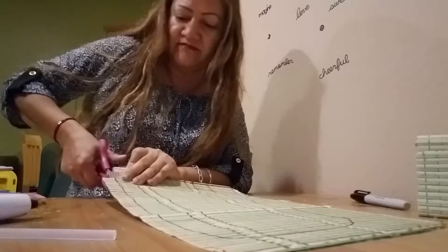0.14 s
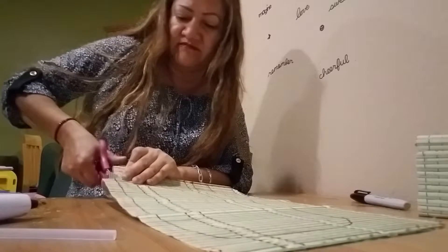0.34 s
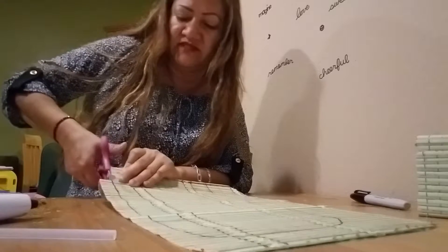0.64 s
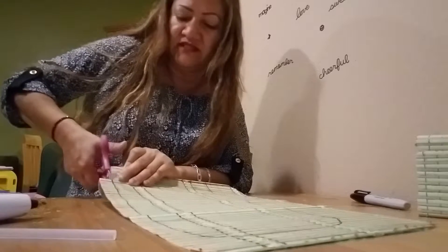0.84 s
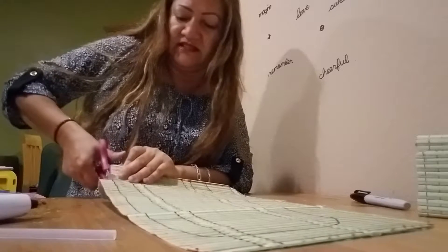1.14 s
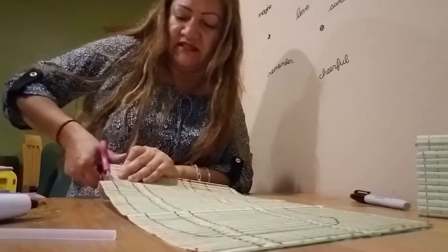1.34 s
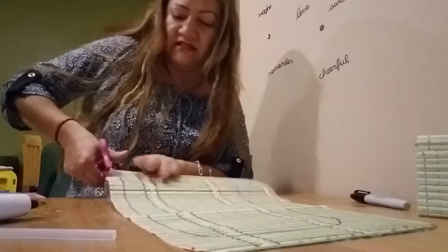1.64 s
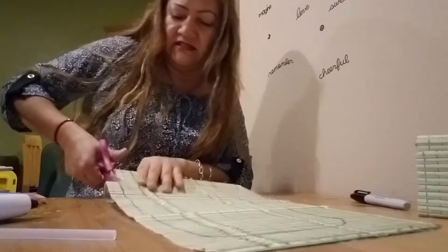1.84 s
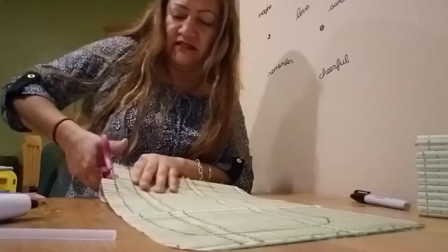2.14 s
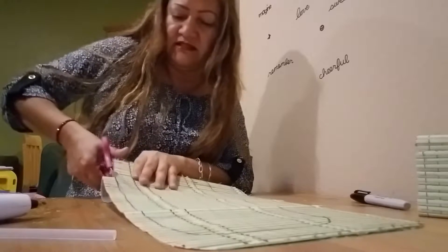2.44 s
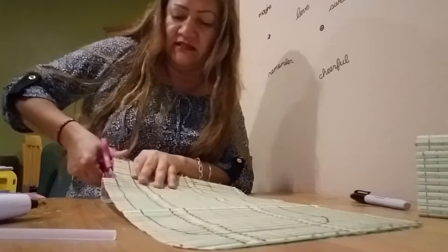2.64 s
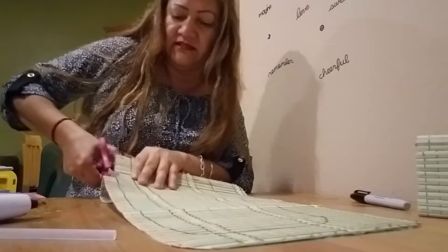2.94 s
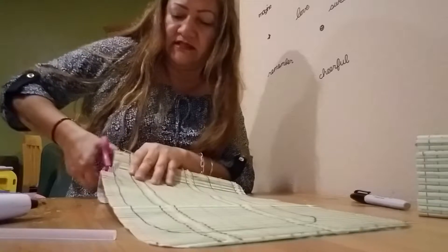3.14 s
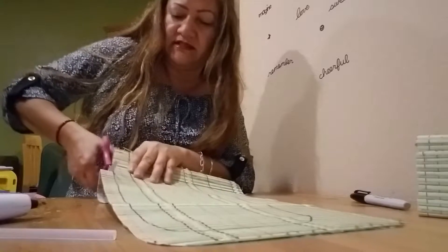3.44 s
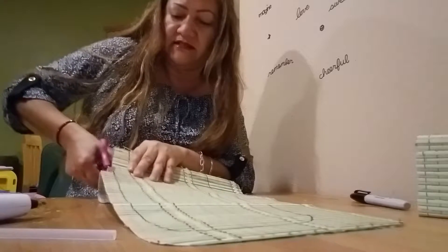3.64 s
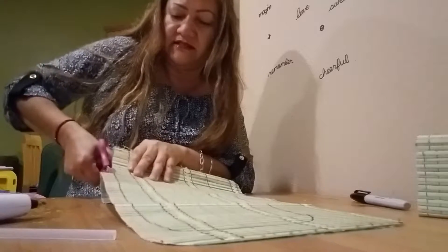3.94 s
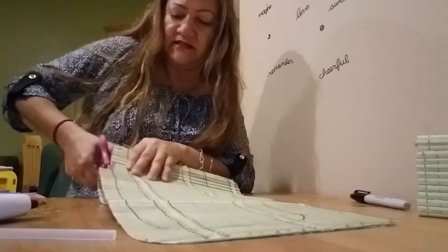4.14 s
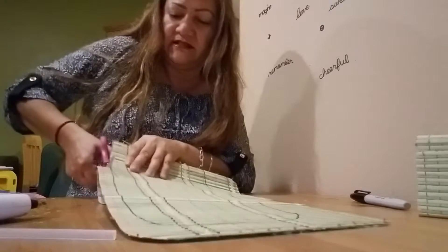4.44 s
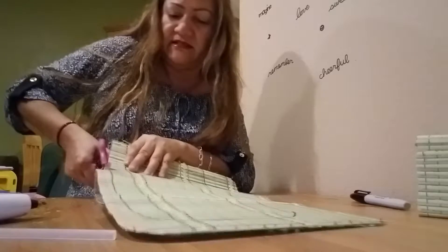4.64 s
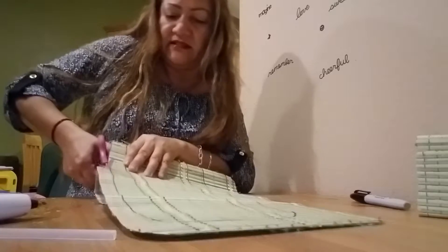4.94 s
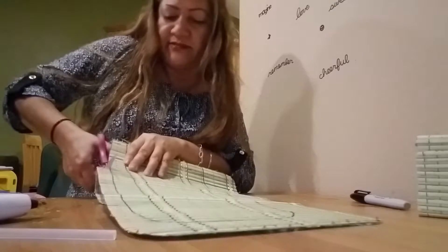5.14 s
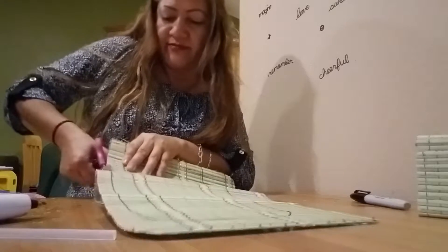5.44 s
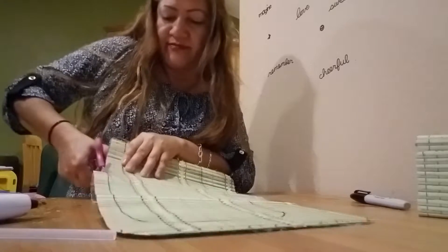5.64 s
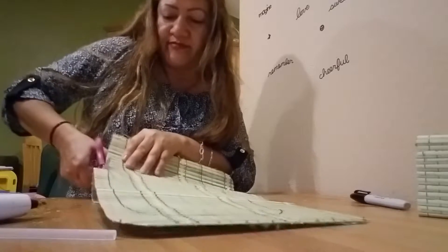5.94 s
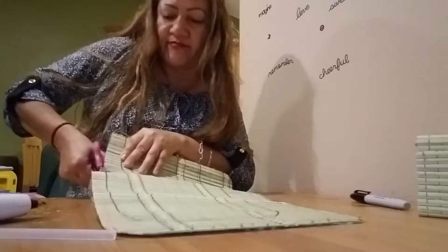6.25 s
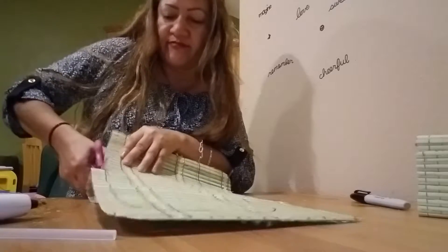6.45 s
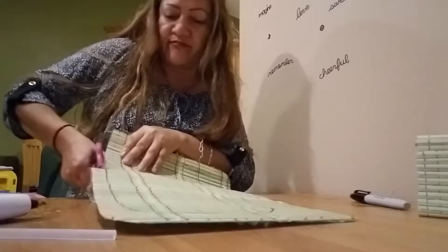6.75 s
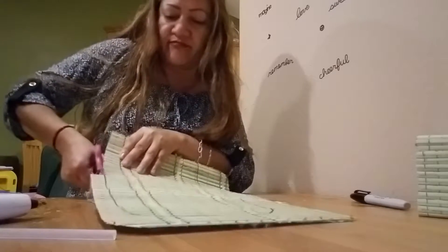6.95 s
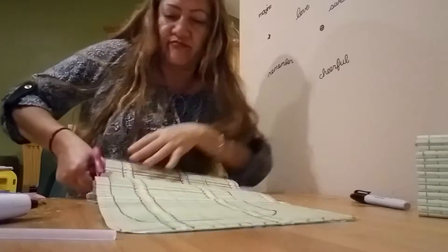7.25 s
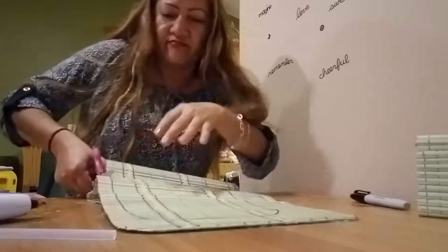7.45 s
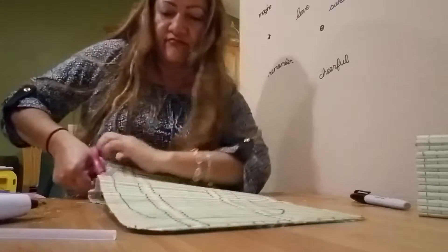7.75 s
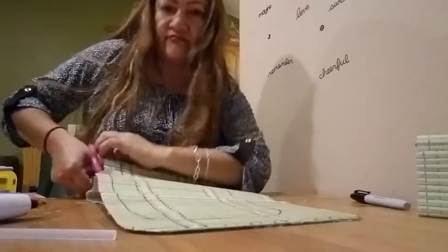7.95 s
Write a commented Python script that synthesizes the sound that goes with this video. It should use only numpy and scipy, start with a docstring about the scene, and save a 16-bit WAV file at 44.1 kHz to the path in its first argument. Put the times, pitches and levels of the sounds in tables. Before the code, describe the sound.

Scissors work through a tough slatted mat on a table, making eight cuts at about one a second. Each squeeze brings a gritty crunch and sharp snaps, often in close pairs, with a soft low thud from the table top. Between cuts the blades tick and scrape open, loose slats click and the mat slides faintly. The sound is close, in a small, hard-walled room with a faint hum.

```python
"""A light wooden knock, a gritty squeeze, a sharp snap: scissors work through a slatted mat on a table.
Each squeeze grinds the blades into the slats, which give way, often two close together,
and set the table top booming. The steel ticks and loose slats knock; between cuts the blades
scrape open and a hand slides the mat along. The small, hard-walled room hums faintly."""
import sys
import numpy as np
from scipy import signal
from scipy.fft import rfft, irfft
from scipy.io import wavfile
from scipy.ndimage import uniform_filter1d

SR = 44100
rng = np.random.default_rng(int(sys.argv[2]) if len(sys.argv) > 2 else 0)


def wav_out(sig):
    """Save sig, one row per channel (or a flat mono array), as 16-bit PCM at SR to the path in sys.argv[1]."""
    wavfile.write(sys.argv[1], SR, np.round(np.clip(np.atleast_2d(sig).T, -1, 1) * 32767).astype(np.int16))


N = 356416
KERNEL_HZ = np.fft.rfftfreq(2048, 1 / SR)  # frequency grid of the EQ curves
STRAIN_LEAD_S = .007  # fibres strain this long before a snap

# Levels are relative within each table; each layer sets its own gain.
# room tone spectrum: frequency_hz, level_db
ROOM_TONE_EQ = [(25, -37.5), (33, -12), (48, -5.5), (72, -1.5), (98, -12), (160, 0.5), (280, -6), (420, -4),
                (560, -11.5), (800, -12), (1600, -19), (4000, -27.5), (8000, -32), (10000, -37.5),
                (14000, -28)]
# hum peaks in the room tone: pitch_hz, width_hz, boost_db
HUM_PEAKS = [(175, 9, 9), (261, 7, 7), (338, 10, 3), (412, 9, 8)]
# likeness of diffuse sound at the two microphones: frequency_hz, correlation
STEREO_LIKENESS = [(60, 0.9), (400, 0.86), (700, 0.27), (1900, 0.019), (3300, 0.12), (7000, -0.035),
                   (16000, 0.22)]
# reverb bands: centre_hz, level_db, t60_s
REVERB_BANDS = [(145, -1.5, 0.82), (421, 0.5, 0.35), (1130, -7, 0.31), (3240, -3.5, 0.36), (7000, -2, 0.33),
                (14800, -0.5, 0.26)]
# colour difference between the microphones: frequency_hz, left_minus_right_db
MIC_EQ = [(100, 3), (700, 1.5), (1400, 0), (2500, 2.5), (3700, 0), (6000, 1), (8000, -3), (9500, 2.5),
          (15000, -0.5)]
# a hand pushes the mat along: start_s, length_s, level_db
MAT_SLIDES = [(0.6, 0.15, -60), (1.496, 0.21, -58), (1.699, 0.074, -55), (1.787, 0.44, -63),
              (4.755, 0.27, -68), (6.3, 0.16, -59), (6.475, 0.23, -64.5), (7.072, 0.093, -58.5)]
# colour of the sliding mat: frequency_hz, gain_db
SLIDE_EQ = [(150, -4), (450, -3.5), (800, 0), (1100, -6), (1400, -1), (1700, -3), (2180, -1.5),
            (2400, -9.5), (4000, -17.5), (8000, -33.5), (16000, -26)]
# resonances of the steel blades: pitch_hz, width_hz, boost_db
STEEL_MODES = [(1343, 100, 1), (2610, 270, 1.5), (6300, 550, 1.5), (7600, 350, 2), (8140, 430, 1.5)]
# colour of steel rubbing on steel and fibre: frequency_hz, gain_db
GRIND_EQ = [(100, -20), (600, 0.5), (1400, 3.5), (2500, -1.5), (4000, -3), (6000, -4), (8000, -8),
            (9400, -13), (14000, -7.5), (16000, -3.5)]
# the blades scrape open: start_s, length_s, level_db, treble_db
BLADE_OPENINGS = [(0.585, 0.084, -56.5, 3.5), (1.881, 0.11, -62.5, 1.5), (2.956, 0.16, -56.5, -6),
                  (4.023, 0.1, -55.5, -1), (4.887, 0.13, -65.5, 7.5), (5.592, 0.072, -54.5, -5),
                  (6.311, 0.15, -55.5, 0), (7.013, 0.23, -61, -4.5), (7.701, 0.2, -60, -4.5)]
# squeezes of the scissors: bite_s, shut_s, grind_db, crunch_length_s, table_jolt_db
SQUEEZES = [(0.17, 0.25, -65, 0, -55), (0.96, 1.2, -66.5, 0.052, -52), (2.325, 2.645, -58, 0.11, -49.5),
            (3.384, 3.666, -67, 0.012, -47), (4.383, 4.59, -59.5, 0.005, -46.5),
            (5.194, 5.375, -60, 0.014, -47.5), (5.95, 6.15, -59, 0.049, -46),
            (6.64, 6.87, -65.5, 0.089, -46)]
# modes of the table top: pitch_hz, level_db, t60_s
TABLE_MODES = [(120.2, 5.5, 0.22), (58.3, -6, 0.24), (86, -8, 0.12), (174, -12, 0.38), (348, -2, 0.22)]
# loose slats hit the blades and each other: start_s, level_db, hollow_db, crisp_db, pitch_hz
SLAT_KNOCKS = [(0.0742, -44.5, -32, -5.5, 3330), (0.7473, -57, 19.5, -16, 1250),
               (1.2998, -47.5, -11, -1, 2340), (2.0638, -59.5, 7, -19, 1980), (2.36, -47, -18, 4, 1920),
               (2.5982, -41, -13, -6.5, 1480), (2.9559, -52.5, 6.5, -10, 1400), (3.4292, -53.5, 2, 1, 2060),
               (3.595, -58, -2, -2, 1420), (5.65, -57.5, 12, -9, 1870), (5.9827, -47, 5, -8, 1590),
               (6.639, -54, -4, -8, 1720), (7.705, -49.5, -3, -4, 4300), (7.7484, -50, 5, -12, 3320),
               (7.787, -60, 7, -15, 3300)]
# the steel edges catch on each other: start_s, level_db, brightness_db
STEEL_TICKS = [(0.19, -60.5, 7), (0.406, -52, 5), (0.5831, -58, 1), (0.9574, -64, 10), (1.063, -50.5, 2.5),
               (2.4017, -39, 3), (2.828, -62, 6), (3.3812, -51.5, 2.5), (3.447, -48, 1), (4.399, -48, -1.5),
               (4.442, -48.5, 0), (4.466, -49.5, -2), (4.4922, -50.5, 5), (5.1237, -58.5, 11),
               (5.1995, -40, -1.5), (5.266, -42, 2.5), (6.122, -55, -3), (6.373, -51.5, -5),
               (6.7072, -50.5, 9), (7.435, -63.5, 5), (7.987, -64, -2)]
# colour of a crack: frequency_hz, gain_db
CRACK_EQ = [(40, -28), (130, -17), (280, -14), (500, -10), (750, -6), (1300, -6.5), (2100, -5),
            (2600, -9.5), (3400, -9), (5500, -9), (8000, -6.5), (9300, -19), (11500, -16), (14500, -9),
            (16000, -22.5)]
# slats break: start_s, level_db, hollow_db, woody_db, crisp_db, pitch_hz, decay_s
SLAT_BREAKS = [(0.255, -33, 0.5, 3, 3, 1350, 0.0075), (0.2592, -36.5, 1, 6, 2.5, 1420, 0.0034),
               (1.0932, -37, 0, 1, 4, 1290, 0.0074), (1.1263, -39, 4, 5, 1.5, 1260, 0.0029),
               (1.3534, -28, 0.5, 1.5, 0.5, 1260, 0.0035), (2.442, -35.5, 5, 3.5, 4.5, 1290, 0.0035),
               (2.478, -48, 3, 13.5, -1, 1300, 0.0018), (2.5098, -42.5, 10, 5.5, -5, 1320, 0.002),
               (2.6495, -34, 6.5, 6.5, 3.5, 1290, 0.002), (3.4612, -39, 8.5, 3, -2.5, 1260, 0.011),
               (3.6433, -27.5, 3, 0.5, -1.5, 1550, 0.0053), (3.833, -27, 1, -5, 2, 1210, 0.0025),
               (4.564, -38.5, 3, -2.5, 1.5, 1190, 0.0076), (4.5903, -28, 1, 0.5, 1, 1230, 0.0053),
               (5.312, -33.5, 1.5, 6.5, 1, 800, 0.0034), (5.355, -32.5, 0.5, 0.5, 4, 914, 0.0061),
               (6.0232, -33.5, 4, 3, 0.5, 810, 0.007), (6.1465, -25.5, -0.5, -0.5, 1, 2660, 0.0032),
               (6.728, -35, 4, 0.5, 0.5, 1480, 0.007), (6.747, -38, 2.5, 0, 3, 980, 0.0068),
               (6.8056, -30.5, -0.5, -2.5, 0, 965, 0.0039), (6.8654, -33.5, -1.5, 5.5, -0.5, 2600, 0.0018)]


def from_db(db):
    """Decibels to gain."""
    return 10 ** (np.asarray(db) / 20)


def unit_rms(x):
    """Scale to unit rms."""
    return x / np.sqrt(np.mean(x ** 2) + 1e-20)


def unit_energy(x):
    """Scale each channel to unit energy."""
    return x / np.sqrt(np.sum(x ** 2, axis=-1, keepdims=True) + 1e-20)


def at_hz(points, hz):
    """Read a breakpoint curve along log frequency."""
    points = np.array(points)
    return np.interp(np.log(np.maximum(hz, 1)), np.log(points[:, 0]), points[:, 1])


def bell(hz, centre_hz, width_hz):
    """Shape of a resonance, 1 on top."""
    return 1 / (1 + (2 * (hz - centre_hz) / width_hz) ** 2)


def eq(x, curve_db):
    """Minimum-phase EQ with the given curve on KERNEL_HZ."""
    cepstrum = irfft(np.log(from_db(curve_db)))
    half = len(cepstrum) // 2
    cepstrum[1:half] *= 2
    cepstrum[half + 1:] = 0
    return signal.fftconvolve(x, irfft(np.exp(rfft(cepstrum))))[:len(x)]


def through(x, response):
    """Play a mono sound through a stereo response."""
    return signal.fftconvolve(x[None], response, axes=1)[:, :N]


def add(track, start_s, sound):
    """Mix a sound in at its cue."""
    start = max(round(start_s * SR), 0)
    track[..., start:start + sound.shape[-1]] += sound[..., :N - start]


def grains(size, per_s, spread_db):
    """Fibres catch or break at random moments, with uneven strengths."""
    born = rng.random(size) < per_s / SR
    return born * rng.choice([-1, 1], size) * from_db(spread_db * np.clip(rng.standard_normal(size), -2, 2))


def diffuse_noise(size):
    """White stereo noise, centred in the bass and wide in the treble."""
    alike = np.clip(at_hz(STEREO_LIKENESS, np.fft.rfftfreq(size, 1 / SR)), -1, 1)
    mid, side = rfft(rng.standard_normal((2, size)))
    return irfft((np.sqrt(1 + alike) * mid + np.sqrt(1 - alike) * side * [[1], [-1]]) / np.sqrt(2), size)


def room_tone(level_db=-57.5):
    """A steady bed of noise whose narrow peaks make a wavering hum."""
    hz = np.fft.rfftfreq(N, 1 / SR)
    hum_db = sum(db * bell(hz, pitch_hz, width_hz) for pitch_hz, width_hz, db in HUM_PEAKS)
    spectrum = rfft(diffuse_noise(N)) * from_db(at_hz(ROOM_TONE_EQ, hz) + hum_db)
    return from_db(level_db) * unit_rms(irfft(spectrum, N))


def room_response(mic_lag_s=.0001, scatter_s=.0028, wall_s=.0113, smear_s=.0018, swell_s=.019, size=18000):
    """The room from one spot on the mat: early sound (direct, table scatter, near wall) and tail."""
    t, hz = np.arange(size) / SR, np.fft.rfftfreq(size, 1 / SR)
    noise = diffuse_noise(size)
    direct = np.sinc((t - np.array([[2], [1]]) * mic_lag_s) * SR)  # reaches the right side first
    scatter = from_db(-.5) * unit_energy(noise * (t > 3 * mic_lag_s) * np.exp(-t / scatter_s))
    slap = from_db(-4.5) * unit_energy(noise * (t > wall_s) * np.exp(-np.abs(t - wall_s) / smear_s))
    # the tail swells as reflections pile up, and each band dies at its own pace
    late, tail = rfft(diffuse_noise(size)), 0
    swell = 1 - np.exp(-(t / swell_s) ** 4)
    centres = np.log([row[0] for row in REVERB_BANDS])
    for share, (_, db, t60_s) in zip(np.eye(len(REVERB_BANDS)), REVERB_BANDS):
        band = irfft(late * np.interp(np.log(hz + 1), centres, share), size)
        tail = tail + from_db(db) * band * unit_energy(swell * np.exp(-np.log(1000) * t / t60_s))
    return direct + scatter + slap, tail


def press(start_s, end_s, fade_s):
    """Pressure of a hand: it rises, holds and lets go."""
    t = np.arange(N) / SR
    return np.clip(np.minimum(t - start_s, end_s - t) / fade_s, 0, 1)


def mat_slides(gain_db=-.5, stick_db=3, slips_per_s=45):
    """Skin and slats rub over the table: dense, dull friction that sticks and slips."""
    t = np.arange(N) / SR
    push = sum(from_db(db) * press(s, s + length_s, fade_s=.032) for s, length_s, db in MAT_SLIDES)
    grip = rng.standard_normal(int(t[-1] * slips_per_s) + 2)
    slip = from_db(stick_db * np.interp(t * slips_per_s, np.arange(len(grip)), grip))
    rub = eq(grains(N, per_s=4000, spread_db=4.5), at_hz(SLIDE_EQ, KERNEL_HZ))
    return from_db(gain_db) * push * slip * unit_rms(rub)


def steel_ring_db():
    """The blades' resonances colour everything they touch."""
    return sum(db * bell(KERNEL_HZ, hz, width_hz) for hz, width_hz, db in STEEL_MODES)


def first_break_s(bite_s):
    """When the first slat gives way after the blades bite."""
    return min(row[0] for row in SLAT_BREAKS if row[0] > bite_s)


def blade_strokes(grind_treble_db=5, crunch_treble_db=3.5, crunch_lead_s=.019, typical_crunch_s=.073):
    """Cues for opening, grinding and crushing a first slat: start_s, end_s, level_db, treble_db."""
    strokes = [(s, s + length_s, db, treble_db) for s, length_s, db, treble_db in BLADE_OPENINGS]
    for bite_s, shut_s, grind_db, crunch_s, _ in SQUEEZES:
        strokes.append((bite_s, shut_s, grind_db, grind_treble_db))
        if crunch_s > 0:
            start_s = first_break_s(bite_s) - crunch_lead_s
            # every crunch crushes the same fibres, so a slow one is softer
            crunch_db = -46 - 10 * np.log10(crunch_s / typical_crunch_s)
            strokes.append((start_s, start_s + crunch_s, crunch_db, crunch_treble_db))
    return strokes


def blade_grind(gain_db=-2, shelf_hz=6000, sing_hz=7300, sing_db=.5):
    """The edges rub past each other and through the fibres: a gritty, faintly singing hiss."""
    out = np.zeros(N)
    catches = grains(N, per_s=2600, spread_db=6.5)
    sing = sing_db * bell(KERNEL_HZ, sing_hz, width_hz=1100)
    grit = unit_rms(eq(catches, at_hz(GRIND_EQ, KERNEL_HZ) + steel_ring_db() + sing))
    treble = signal.sosfilt(signal.butter(1, shelf_hz, "high", fs=SR, output="sos"), grit)
    for start_s, end_s, db, treble_db in blade_strokes():
        shelved = grit + (from_db(treble_db) - 1) * treble
        out += from_db(db + gain_db) * press(start_s, end_s, fade_s=.025) * shelved
    return out


def table_thuds(gain_db=6, attack_s=.033, typical_snap_db=-32.5, follow=.58, fade_db_per_s=20):
    """Each break sets the table top booming: more for a hard snap, less as the squeeze goes on."""
    out, t = np.zeros(N), np.arange(22000) / SR
    for start_s, snap_db, *_ in SLAT_BREAKS:
        bite_s, *_, squeeze_db = max(row for row in SQUEEZES if row[0] < start_s)
        fade_db = fade_db_per_s * (start_s - first_break_s(bite_s))
        jolt_db = squeeze_db + follow * (snap_db - typical_snap_db) - fade_db
        boom = sum(from_db(db - 60 * t / t60_s) * np.sin(2 * np.pi * (hz * t + rng.random()))
                   for hz, db, t60_s in TABLE_MODES)
        add(out, start_s, from_db(jolt_db + gain_db) * boom * (1 - np.exp(-t / attack_s)))
    return out


def ripple_db(x):
    """Broad humps and dips in the spectrum of a short stereo sound, on KERNEL_HZ."""
    power = np.mean(np.abs(rfft(x, 2 * (len(KERNEL_HZ) - 1))) ** 2, axis=0)
    power = uniform_filter1d(power, size=27)
    return 10 * np.log10(power / power.mean() + 1e-9)


def fracture(decay_s, lightness, attack_s=.00018, strain_db=-11, break_delay_s=.0016, size=2048):
    """Fibres strain, then fail in one hard break amid an avalanche of small ones."""
    t = np.arange(size) / SR - STRAIN_LEAD_S
    after = np.maximum(t, 0)
    strain = from_db(strain_db) * np.exp(-np.abs(t) / (.39 * decay_s))
    avalanche = (1 - np.exp(-(after / attack_s) ** 2)) * np.exp(-after / decay_s)
    splinters = unit_energy((strain + avalanche) * grains(size, per_s=11000, spread_db=7.5))
    main_break = .6 * signal.unit_impulse(size, round(STRAIN_LEAD_S * SR) + round(break_delay_s * SR))
    return unit_energy(splinters + (1 + 1.85 * lightness) * main_break)  # light hits click more cleanly


def crack(db, hollow_db, woody_db, crisp_db, pitch_hz, decay_s, gain_db=37.5, ring_db=8.5, ring_q=6.7):
    """The voice of knocks, ticks and snaps: a sharp burst rings slat and steel into the room."""
    lightness = np.clip((-32 - db) / 15, 0, 1)  # 0 for a hard snap, 1 for a faint tick
    burst = fracture(decay_s, lightness)
    shade = [(700, hollow_db), (1300, woody_db), (2300, woody_db),
             (3600, -crisp_db / 4), (8000, crisp_db / 2), (10500, crisp_db)]
    slat_ring_db = ring_db * bell(KERNEL_HZ, pitch_hz, pitch_hz / ring_q)
    tone_db = at_hz(CRACK_EQ, KERNEL_HZ) + at_hz(shade, KERNEL_HZ) + steel_ring_db() + slat_ring_db
    early, tail = room_response()  # the blades move on, so every hit has its own echoes
    # the tail gathers all directions, which evens out the single breaks and keeps only their colour
    impulse = signal.unit_impulse(len(burst), round(STRAIN_LEAD_S * SR))
    send = eq(impulse, tone_db + .93 * (1 - lightness) * steel_ring_db())
    far = from_db(-lightness) * through(send, tail)  # light hits stay a little drier
    # the slat sets the broad colour; the single breaks only add fine detail
    near = through(eq(burst, tone_db - ripple_db(through(burst, early))), early)
    return from_db(db + gain_db) * (near + far)


def slat_knocks(woody_db=4.5, decay_s=.0019):
    """Short, woody clicks of slats that shift without breaking."""
    out = np.zeros((2, N))
    for start_s, db, hollow_db, crisp_db, pitch_hz in SLAT_KNOCKS:
        add(out, start_s - STRAIN_LEAD_S, crack(db, hollow_db, woody_db, crisp_db, pitch_hz, decay_s))
    return out


def steel_ticks(thinning=.84):
    """Light catches of the steel edges: the brighter, the less wood in them."""
    out = np.zeros((2, N))
    for start_s, db, bright_db in STEEL_TICKS:
        thin_db = thinning * bright_db
        tick = crack(db, 1 - thin_db, -3 - thin_db, bright_db, pitch_hz=1330, decay_s=.002)
        add(out, start_s - STRAIN_LEAD_S, tick)
    return out


def slat_snaps():
    """The slats break one by one, each cut piece with its own brief ring."""
    out = np.zeros((2, N))
    for start_s, *slat in SLAT_BREAKS:
        add(out, start_s - STRAIN_LEAD_S, crack(*slat))
    return out


def scene():
    """Hits and friction in the room, over a bed of room tone."""
    hits = slat_snaps() + steel_ticks() + slat_knocks() + table_thuds()
    friction = through(blade_grind() + mat_slides(), sum(room_response()))
    return hits + friction + room_tone()


def record(dry, cutoff_hz=16000):
    """Each microphone adds its own colour; a steep low-pass cuts the top."""
    tilt_db = at_hz(MIC_EQ, KERNEL_HZ) / 2
    heard = np.array([eq(dry[0], tilt_db), eq(dry[1], -tilt_db)])
    return signal.sosfilt(signal.ellip(10, .2, 70, cutoff_hz, fs=SR, output="sos"), heard)


dry = scene()
out = record(dry)
wav_out(out)
```